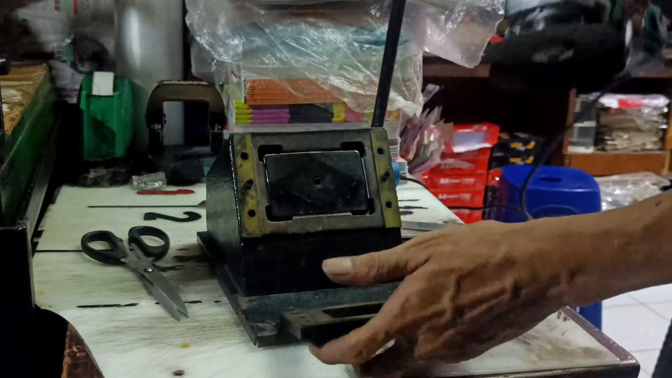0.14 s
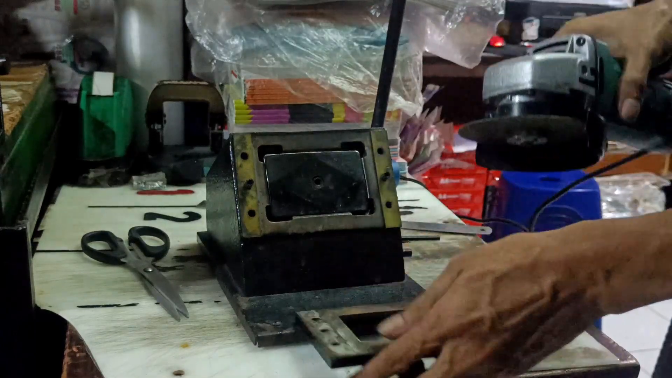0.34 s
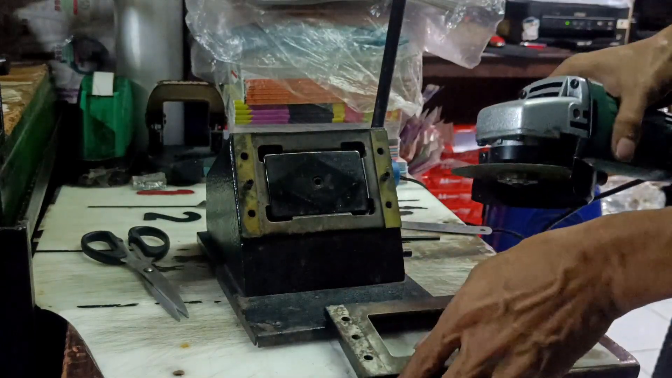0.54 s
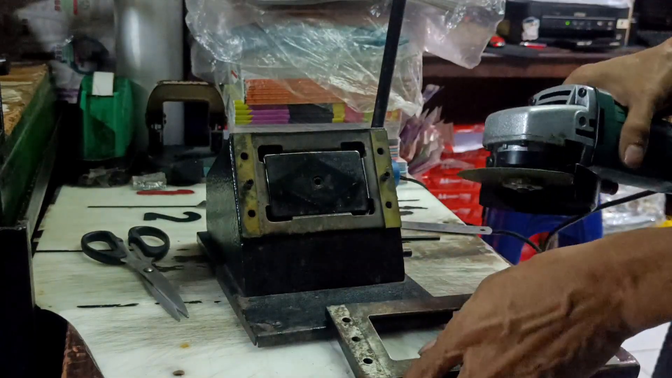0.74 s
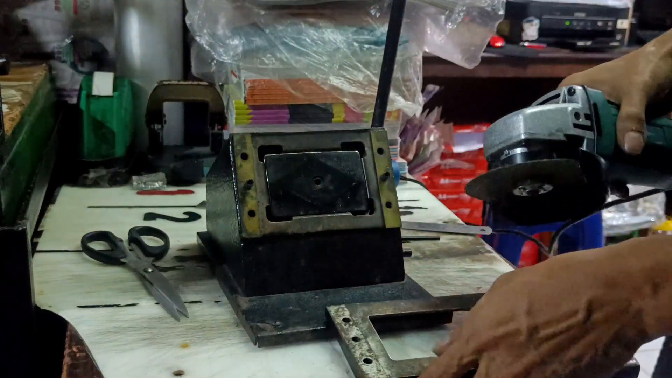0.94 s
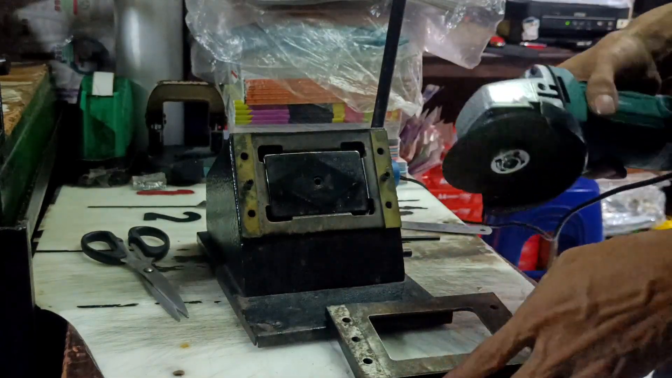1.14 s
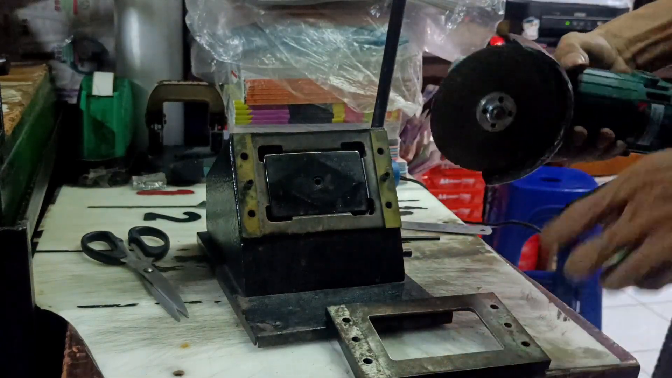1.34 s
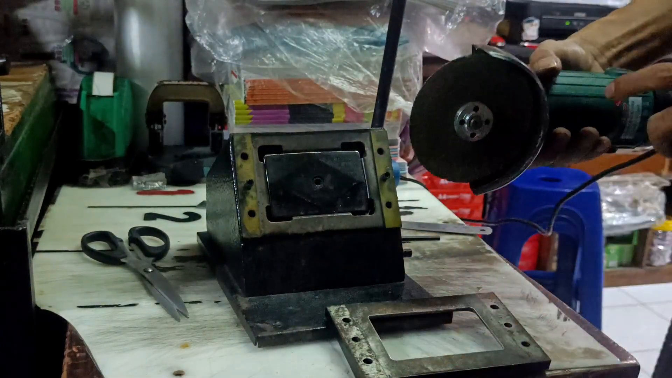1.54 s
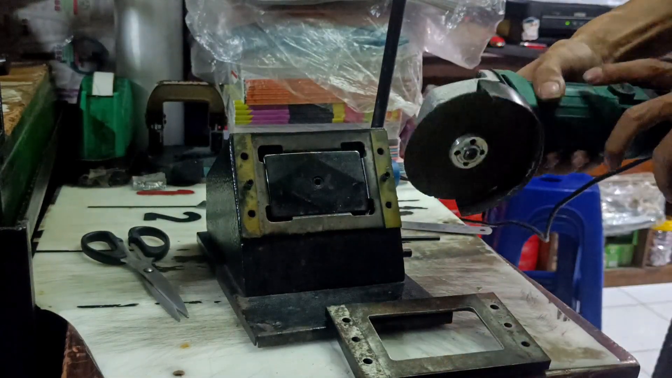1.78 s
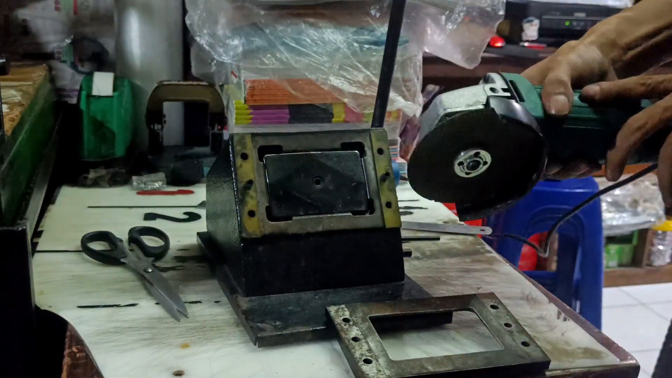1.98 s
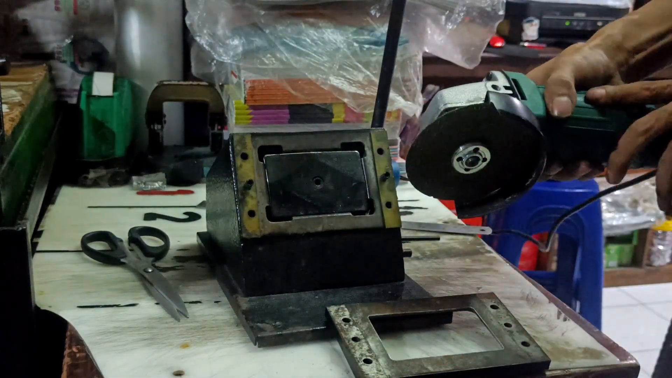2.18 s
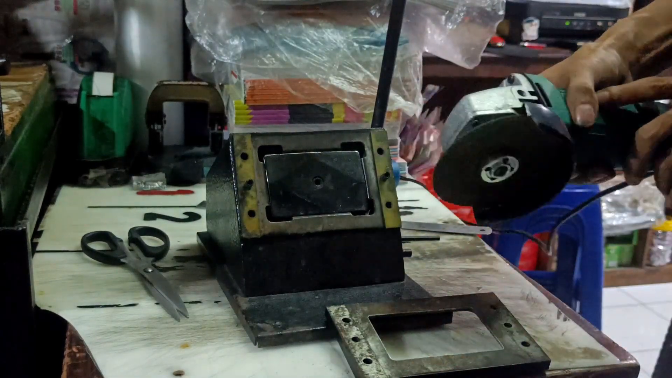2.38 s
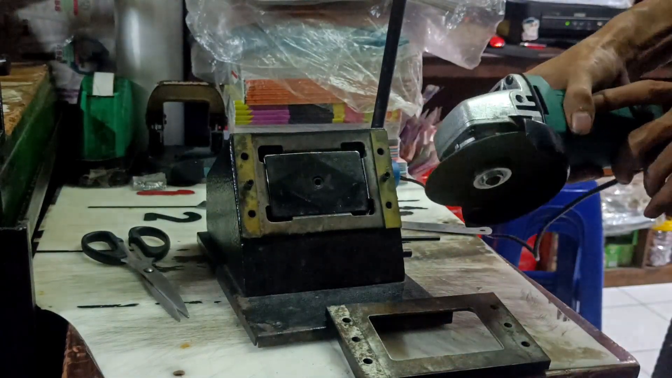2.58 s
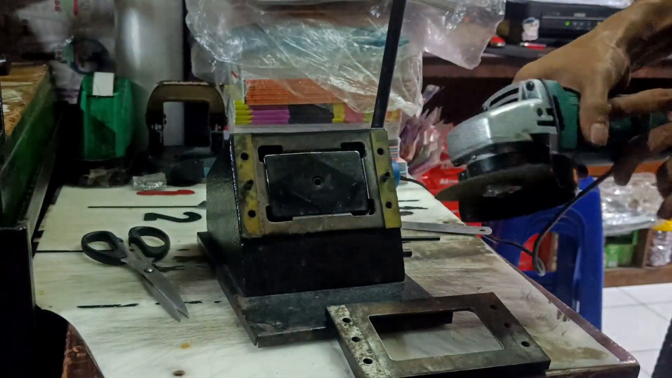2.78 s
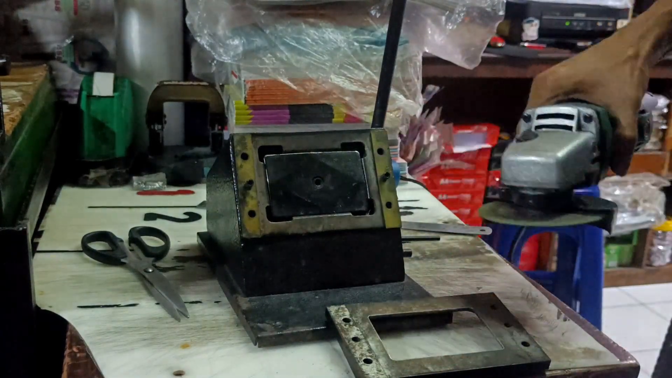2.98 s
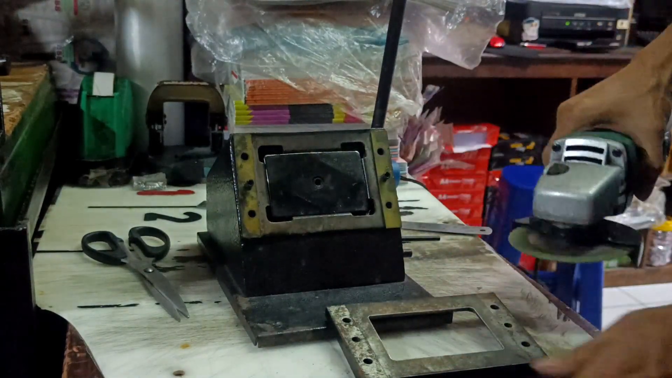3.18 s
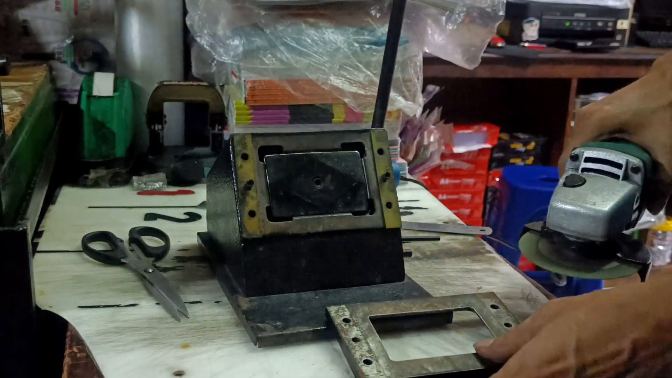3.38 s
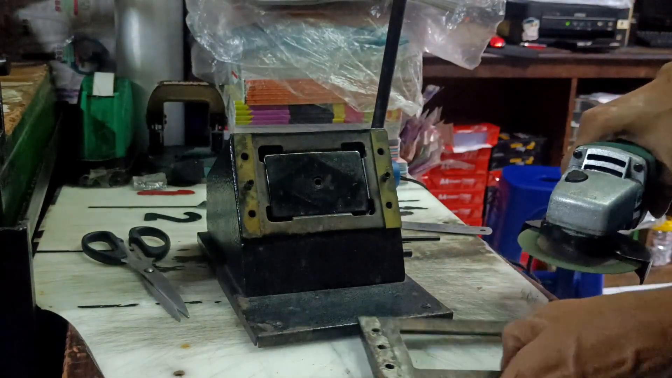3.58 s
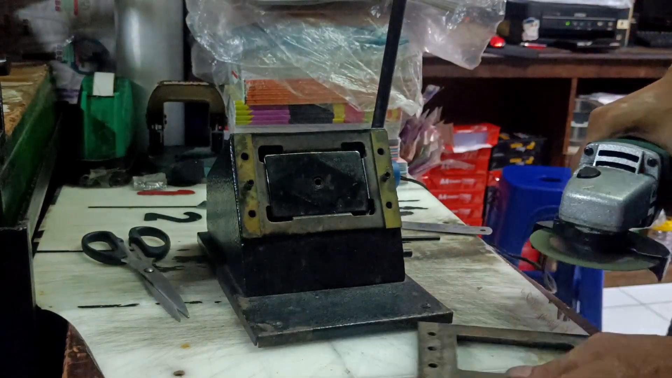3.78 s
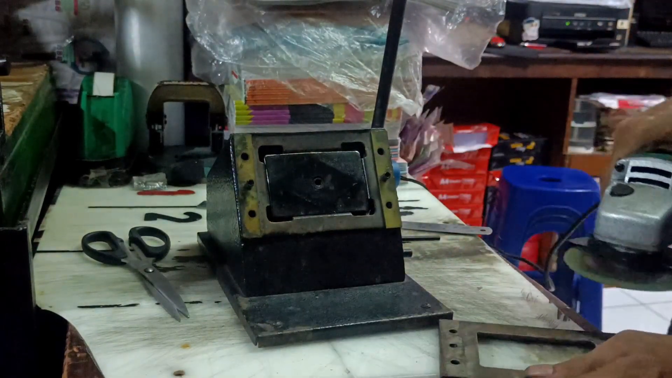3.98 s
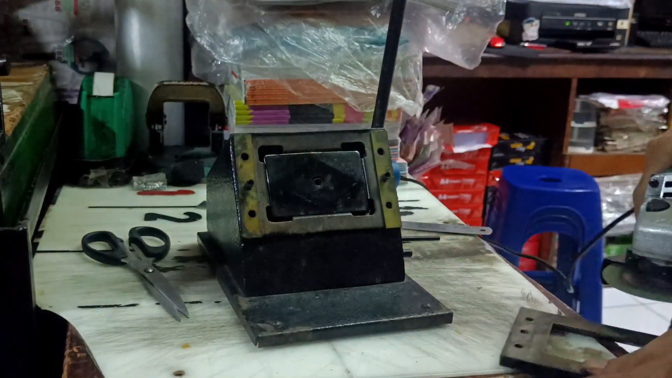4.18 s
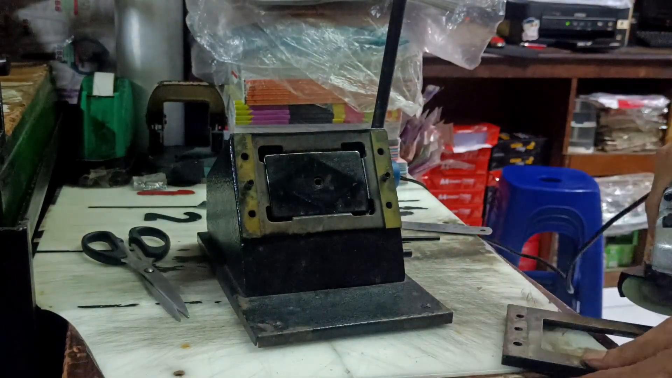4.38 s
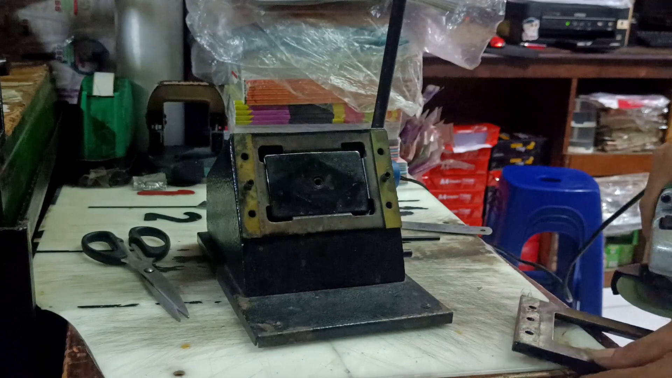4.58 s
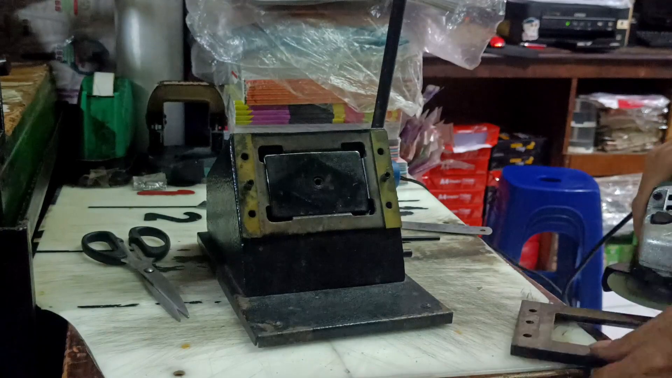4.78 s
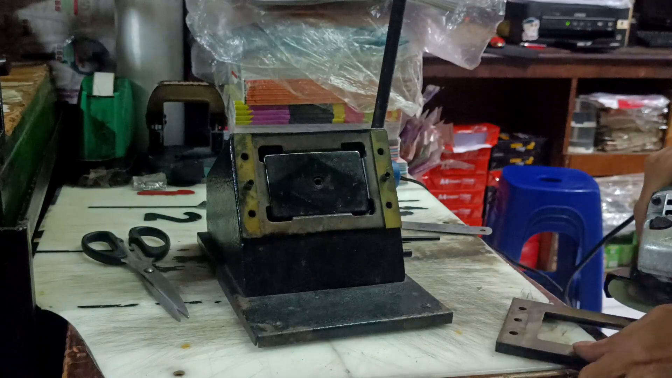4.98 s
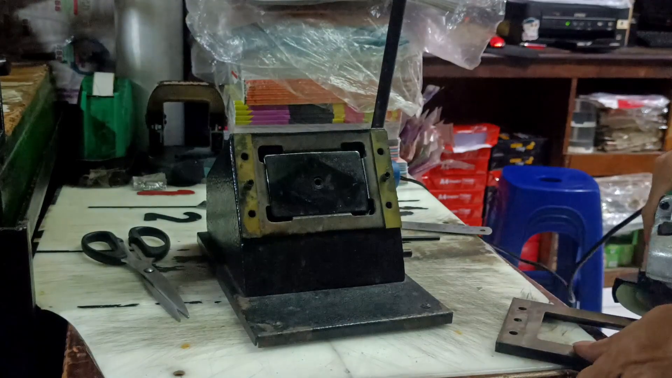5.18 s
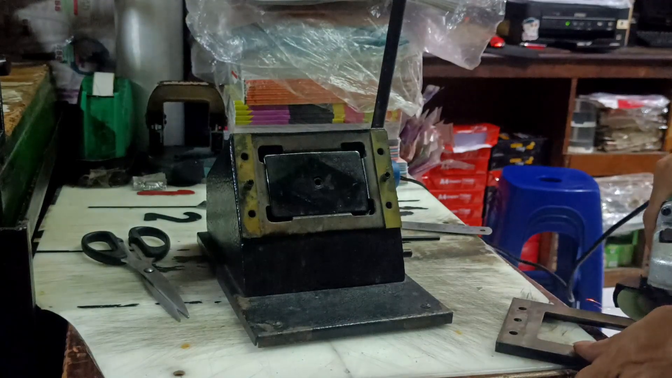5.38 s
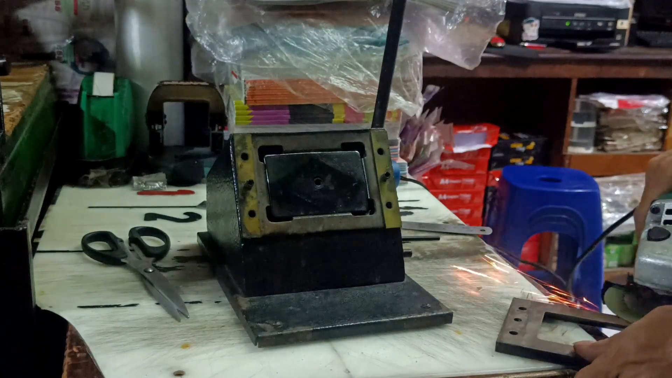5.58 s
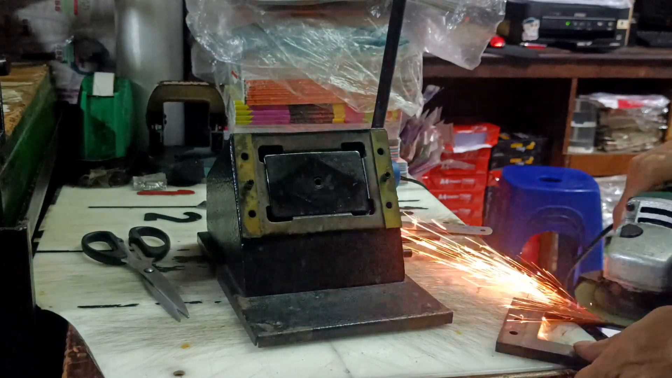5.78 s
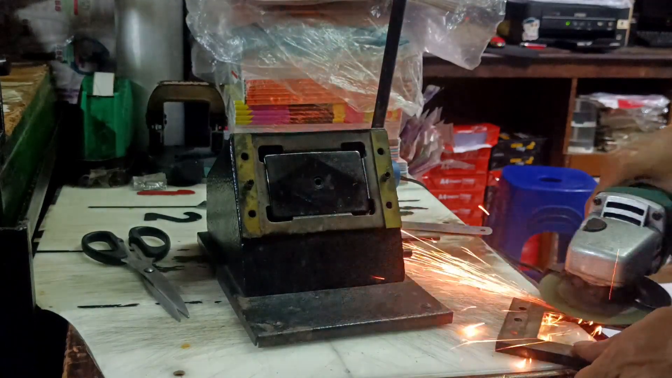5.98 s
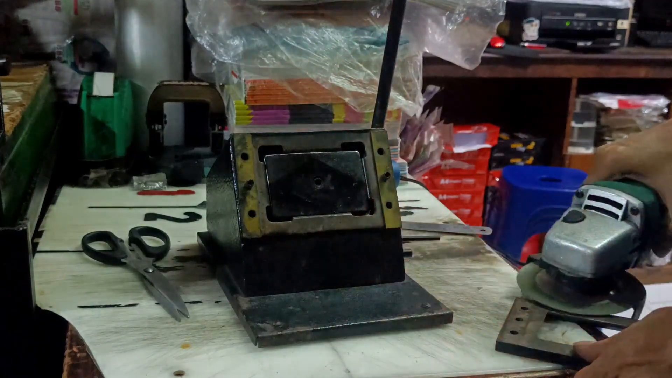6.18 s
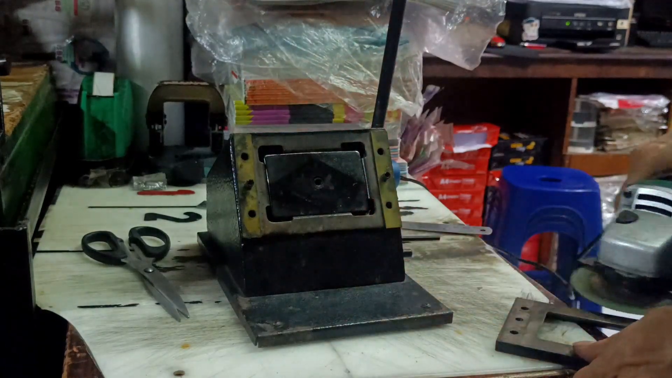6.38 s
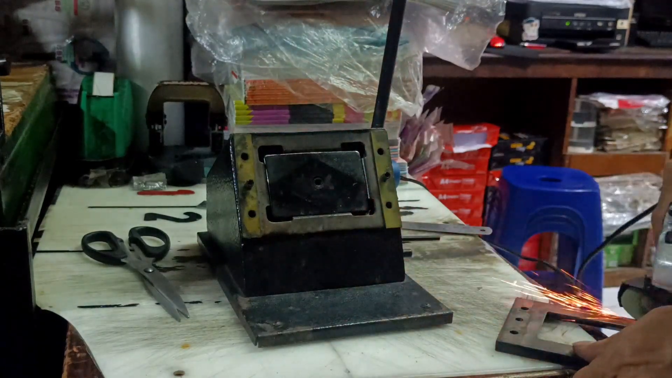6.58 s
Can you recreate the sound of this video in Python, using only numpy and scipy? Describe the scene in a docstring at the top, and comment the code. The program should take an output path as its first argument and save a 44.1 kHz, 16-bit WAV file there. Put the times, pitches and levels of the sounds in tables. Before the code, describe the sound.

Close stereo sound from a small open-fronted shop: soft traffic rumble, steel scraping and knocking on a wooden bench. After a lull, a handheld grinder starts abruptly, its motor shuddering then racing up to a bright, wavering whine with airy hiss. The part clacks sharply; later the disc bites steel with uneven rasping chatter, the motor sags slightly, the tool swings away duller, and the disc touches again.

```python
"""An angle grinder is switched on in a small shop open to a street, runs up to speed and is pressed on a
steel part, which chatters; two microphone ports hear the tool from one side. Shaped noise makes its rush,
sines locked to the turning armature make whine, hum and chatter, and low noise makes the disc's puffs.
Before that the part is slid and set down on a wooden bench (friction noise, ringing modes); a few more
clacks follow. Behind lie rumble, wash and a hiss that swells around the switch-on, and passing engines."""
import sys
import numpy as np
from scipy import signal
from scipy.io import wavfile
from scipy.ndimage import uniform_filter1d

SR = 44100
rng = np.random.default_rng(int(sys.argv[2]) if len(sys.argv) > 2 else 0)


def inscribe(sig):
    """Save sig as 16-bit PCM at rate SR to the path in sys.argv[1].

    A 1-D sig is mono; a 2-D sig holds one channel per row.
    Samples are clipped to [-1, 1] before scaling.
    """
    pcm = np.round(np.clip(np.atleast_2d(sig).T, -1, 1) * 32767)
    wavfile.write(sys.argv[1], SR, pcm.astype(np.int16))


N = 292824
T = np.arange(N) / SR
SWITCH_S = 2.46

# how far the left port trails the right: s, lag_samples
PORT_LAG = [(1.8, 13), (2.3, 1.8), (2.8, 1.4), (3.5, 3.7), (4.1, 5.4), (4.5, 6.6), (5.8, 5.87), (6.05, 4.5),
            (6.64, 5.9)]
# likeness of the two ports for sounds close by: pitch_hz, likeness (0 to 1)
CLOSE_LIKENESS = [(500, 0.47), (1200, 0.85), (2500, 0.34), (5000, 0.49), (9000, 0.043), (14000, 0.058)]


def gain_of(db):
    """Amplitude factor for a level in dB."""
    return 10 ** (np.asarray(db) / 20)


def evened(x):
    """Scale to rms 1."""
    return x / np.sqrt(np.mean(x ** 2) + 1e-20)


def read(points, hz):
    """Read a (pitch, value) curve along a logarithmic pitch axis."""
    f, value = np.transpose(points)
    return np.interp(np.log(hz + 1), np.log(f + 1), value)


def follow(rows, t):
    """Follow each column of a table whose first column is time in s."""
    s, *columns = np.transpose(rows)
    return [np.interp(t, s, c) for c in columns]


def wander(hz):
    """Slow chance of rms 1, changing about hz times a second."""
    knot_rate = 800  # Hz
    knots = np.arange(0, N / SR + .1, 1 / knot_rate)
    lowpass = signal.butter(2, hz, fs=knot_rate, output="sos")
    smooth = signal.sosfiltfilt(lowpass, rng.standard_normal(len(knots)))
    return np.interp(T, knots, evened(smooth))


def noise(field_db, same, size, patchy_db, lean=((1, 0),)):
    """Two-port noise; field_db(Hz, s) gives the level per Hz, broken by drifting patches."""
    hop = size // 4
    hz = np.fft.rfftfreq(size, 1 / SR)[:, None]
    t = np.arange(N // hop + 5) * hop / SR
    a, b, c, d, patches = rng.standard_normal((len(t), len(hz), 5), np.float32).T
    patches = uniform_filter1d(patches, size=size // 64, axis=0)  # smooth along pitch
    patches = evened(uniform_filter1d(patches, size=12, axis=1))  # smooth along time
    like = np.clip(read(same, hz), 0, 1)
    right = a + 1j * b
    delay = np.exp(-2j * np.pi * hz * follow(PORT_LAG, t)[0] / SR)
    left = like * right * delay + np.sqrt(1 - like ** 2) * (c + 1j * d)
    lean_gain = gain_of(read(lean, hz) / 2)
    level = gain_of(field_db(hz, t) + patchy_db * patches)
    spectrum = np.array([left * lean_gain, right / lean_gain]) * level
    return signal.istft(spectrum * np.sqrt(SR / size), nperseg=size, noverlap=size - hop)[1][:, :N]


def sides(pan_db):
    """Left and right gains that differ by pan_db, louder left when positive."""
    return gain_of(np.array([[.5], [-.5]]) * pan_db)


def tones(orders, turns_hz, waver_db, waver_hz, smear):
    """Multiples of a shaft's turning; each wavers in level and phase, a little differently at each port."""
    lag_turns = turns_hz * follow(PORT_LAG, T)[0] / SR
    turns = np.cumsum(turns_hz) / SR - np.outer([1, 0], lag_turns)
    out = np.zeros((2, N))
    for order, db in orders:
        drift = smear * (wander(waver_hz) + np.outer([.4, -.4], wander(waver_hz)))  # radians
        level = gain_of(db + waver_db * wander(waver_hz))
        out += level * np.sin(2 * np.pi * (order * turns + rng.random()) + drift)
    return np.sqrt(2) * out


def armature_hz():
    """A quick and a slow run-up to top speed, less a dip under each load."""
    # speed still to gain at the switch: turns_hz, time_constant_s
    run_up = [(238, .211), (126.9, .567)]
    # load slows the armature: slowest_s, loss_hz
    sags = [(4.921, 3.66), (6.108, 7.49)]
    top_hz, sag_s, recover_s = 500.96, .127, .289
    since = (T - SWITCH_S).clip(0)
    missing = sum(hz * np.exp(-since / tau) for hz, tau in run_up)
    sag = sum(hz * np.exp(-.5 * ((T - s) / np.where(T < s, sag_s, recover_s)) ** 2) for s, hz in sags)
    return top_hz - missing - sag


def rush():
    """Fan and brush noise; its colour shifts with speed and it throbs with the mains during the run-up."""
    # air and brushes, dropping as the tool swings away, before trims: s, level_db, boom_db, treble_db
    # (boom of the housing and treble are relative to the level)
    rush_levels = [(2.46, -20, -8.5, -9.5), (2.56, -18.5, -10, -6), (2.65, -21.5, -4, -1),
                   (3.1, -23, -1, 4), (3.6, -24.5, -2.5, 4.5), (5.0, -24, -0.5, 4), (5.8, -24.5, -1, 5),
                   (5.84, -30.5, -2, 8), (6.04, -30.5, 1, 8.5), (6.2, -31.5, -2, 5.5),
                   (6.64, -30.5, -0.7, 4.5)]
    # colour while the fan is slow and at full speed, before trims: pitch_hz, density_db (per Hz)
    slow_colour = [(300, -36), (700, -43), (946, -15), (1230, -19.5), (1560, -21.5), (1840, -15),
                   (2520, -2), (2900, -9), (4370, -11), (5340, -14.5), (8790, -4), (10700, -31.5),
                   (12900, -11), (16000, -21)]
    fast_colour = [(300, -28.5), (660, -18.5), (1000, -10.5), (1750, -6), (2750, -7.5), (4350, -2.5),
                   (5200, -7.5), (6900, -6.5), (8500, -0.5), (9800, -11.5), (11200, -21), (12400, -7),
                   (13800, -15), (16000, -13.5)]
    # resonances of the housing: pitch_hz, width_hz, added_power_db (relative to the rush)
    housing = [(831.2, 24.2, 24), (1292, 142, 13.5), (1483, 36, 7.5), (1550, 98, 10.5), (2017, 120, 3.5)]
    # how the rush leans by pitch, before an overall pan: pitch_hz, left_minus_right_db
    rush_lean = [(300, 1), (700, 3.5), (1300, 5.5), (2100, 4.5), (3300, 6), (4400, 4), (5600, -1),
                 (7000, -3), (8500, 9.5), (10000, 25.5), (11500, 19.5), (13000, -1), (15500, -0.5)]
    # the gears slam while taking up slack: s, db_over_rush
    jolts = [(2.473, 3.5), (2.482, 3), (2.54, 2.5)]
    jolt_s, mains_hz = 0.0035, 50

    def field_db(hz, t):
        speed = np.clip(np.interp(t, T, armature_hz()) / 490, 0, 1) ** 3
        level_db, boom_db, treble_db = follow(rush_levels, t)
        peaks = sum(gain_of(db) ** 2 / (1 + (2 * (hz - f) / w) ** 4) for f, w, db in housing)
        peaks_db = 10 * np.log10(1 + peaks)
        low = 1 / (1 + (hz / 1800) ** 12)  # share of boom
        high = 1 / (1 + (6300 / (hz + 1)) ** 8)  # share of treble
        fast_db = read(fast_colour, hz) + peaks_db - 27.5 - 1.93 * low - 7.7 * high
        slow_db = read(slow_colour, hz) - 29 + 12 * low + 1.3 * high
        colour_db = speed * fast_db + (1 - speed) * slow_db
        return colour_db + level_db + low * boom_db + high * treble_db + 3.5

    since = T - SWITCH_S
    # the starting current dies away, quickly and slowly
    surge = .5 * np.exp(-since.clip(0) / 0.093) + 0.44 * np.exp(-since.clip(0) / 0.71)
    mains_phase = 2 * np.pi * 2 * mains_hz * (T - 2.4615) + 0.06 * wander(30)  # twice a cycle
    throb = (0.009 + surge) * np.cos(mains_phase)
    flutter_db = 0.74 * wander(91) + 0.44 * wander(8.2)  # sparking brushes and loose gears
    switch = np.clip((since + .002) / .0015, 0, 1)
    jolt_db = sum(db * np.exp(-.5 * ((T - s) / jolt_s) ** 2) for s, db in jolts)
    gain = gain_of(6.4 * throb + flutter_db + jolt_db) * switch
    steady = noise(field_db, CLOSE_LIKENESS, size=512, patchy_db=0.93, lean=rush_lean)  # not yet throbbing
    return steady * gain * sides(-.4)


def motor():
    """Gear teeth whine once per mesh; the unbalanced armature hums."""
    # whine of the gears as the hand turns the tool, before a trim: s, level_db, left_minus_right_db
    mesh = [(2.46, -50, 2), (2.62, -32, 6), (2.72, -38, 0), (2.9, -36, -10), (2.98, -30.5, 4),
            (3.07, -25.5, 4), (3.14, -32, -2), (3.23, -25.5, 2), (3.38, -22.5, 2), (3.46, -23, 3),
            (3.6, -24.5, 2.5), (3.74, -24.5, -0.5), (4.1, -38, 24), (4.3, -29.5, 10), (4.61, -23, 0),
            (4.85, -23.5, 1), (5.04, -27, -7), (5.21, -21, 0), (5.35, -27, 8), (5.55, -23.5, 5),
            (5.81, -30.5, 5), (5.88, -41, 4), (6.0, -27, 3), (6.06, -31, 1), (6.1, -28, 2),
            (6.23, -28, 4.5), (6.41, -31, -6), (6.53, -26.5, 8), (6.64, -27, 10)]
    # weaker tones swelling as the hand turns the tool: s, one_turn_db, two_turns_db (and its multiples)
    turned = [(2.46, -65, -77), (2.75, -56, -44), (3.05, -43.5, -48), (3.35, -63, -37), (3.65, -45.5, -33),
              (4, -46, -37.5), (4.2, -39.5, -35), (4.65, -45, -38), (5.2, -49.5, -34), (5.5, -47, -35.5),
              (5.95, -57, -40), (6.2, -49, -44), (6.35, -51, -35.5), (6.64, -49, -40)]
    # level of the whine's octave: s, level_db
    octave_levels = [(2.62, -50), (2.76, -30), (3.02, -34), (3.3, -41), (4.1, -42), (4.42, -38),
                     (4.65, -42), (5.2, -36.5), (5.5, -41), (5.95, -39), (6.3, -41), (6.64, -45)]
    # tones within whine, octave and hum: armature_order, relative_db
    whine_orders = [(12, 3), (13, -15)]
    octave_orders = [(24, 2), (25, -11)]
    hum_orders = [(2, 1), (4, -1.5), (8, -0.5), (16, -4)]
    turns_hz = armature_hz()
    whine_db, pan_db = follow(mesh, T)
    one_db, two_db = follow(turned, T)
    octave_db = follow(octave_levels, T)[0]
    whine = tones(whine_orders, turns_hz, waver_db=1.3, waver_hz=14, smear=.2)
    whine = gain_of(whine_db + 1.5) * sides(pan_db) * whine
    octave = tones(octave_orders, turns_hz, waver_db=1.5, waver_hz=15, smear=.3)
    octave = gain_of(octave_db) * sides(13) * octave
    shake = gain_of(one_db) * tones([(1, 0)], turns_hz, waver_db=1.5, waver_hz=15, smear=.4)
    hum = tones(hum_orders, turns_hz, waver_db=3.0, waver_hz=8.9, smear=1.0)
    hum = gain_of(two_db) * sides(0.83) * hum
    return (whine + octave + shake + hum) * (T > SWITCH_S)


def grinding():
    """The part bounces on the disc thirteen times a turn, harder on the high spots of the disc."""
    # disc on steel, one list a contact, before trims: s, chatter_db
    contacts = [
        [(5.46, -35), (5.505, -23), (5.575, -24), (5.64, -19.5), (5.665, -26.5), (5.81, -21), (5.835, -24.5),
         (5.95, -20), (5.98, -30.5), (6.01, -20.5), (6.08, -22.5), (6.11, -32), (6.14, -26), (6.22, -50)],
        [(6.55, -44), (6.59, -30), (6.64, -29)],
    ]
    # tones of the chatter, before trims: disc_order, relative_db
    chatter = [(2, -24.5), (7, -13.5), (9, -8.5), (11, -7.5), (13, 2.5), (14, -8)]
    pinion_teeth, crown_teeth = 12, 37
    beat_depth = 0.66  # of the once-a-turn beat
    disc_hz = armature_hz() * pinion_teeth / crown_teeth
    lead = tones(chatter[4:5], disc_hz, waver_db=1.2, waver_hz=47.0, smear=0.57)  # order 13
    beats = tones(chatter[:4] + chatter[5:], disc_hz, waver_db=2.5, waver_hz=29.7, smear=0.36)
    out = np.zeros((2, N))
    for rows in contacts:
        db = follow(rows, T)[0]
        start, end = rows[0][0], rows[-1][0] + .02
        touching = np.clip(np.minimum(T - start, end - T) / 0.014, 0, 1)
        out += gain_of(db + 1.5) * touching * (lead + beat_depth * beats)
    return out * sides(2.2)


def puffs():
    """Air thrown by the disc buffets the ports: lumpy low noise, only partly alike at the two."""
    # gusts at the ports: centre_s, level_db, length_s (twice the standard deviation of the swell)
    gust_rows = [(5.96, -36.5, 0.056), (5.997, -45, 0.026), (6.053, -35.5, 0.033), (6.094, -45, .03),
                 (6.14, -46, .03), (6.602, -38, 0.017)]
    shared, own = rng.standard_normal(N), rng.standard_normal((2, N))
    band = signal.butter(2, [15, 90], "band", fs=SR, output="sos")
    air = signal.sosfilt(band, shared + 1.8 * own)
    gusts = sum(gain_of(db) * np.exp(-.5 * ((T - s) / (length / 2)) ** 2) for s, db, length in gust_rows)
    return evened(air) * gusts * sides(13.4)


def ring(modes, rise, pitch=1):
    """Decaying modes after one blow; rise is the time constant of the onset in s."""
    t = T[:SR // 2]
    ringing = sum(gain_of(db - 60 * t / t60) * np.sin(2 * np.pi * hz * pitch * t) for hz, db, t60 in modes)
    return ringing * (1 - np.exp(-t / rise))


def knocks():
    """Each blow sets the bench and the steel ringing and gives a short, scratchy tick."""
    # the part on the bench, before trims: s, bench_thud_db, steel_clack_db, tick_db, bench_pitch_factor
    blows = [(.007, -44, -34, -56, 1), (0.05, -47, -40, -61, 1.04), (0.127, -45, -32, -50, 0.72),
             (.231, -28.5, -15.5, -48, 0.89), (.241, -32, -19.5, -53, .9), (.2505, -57, -23, -64, .9),
             (0.308, -43, -48, -61, 1.1), (0.356, -28.5, -34, -58, .98), (.424, -46, -36.5, -57, 0.93),
             (0.495, -55, -44, -70, 0.89), (.541, -37, -42, -68, 0.94), (0.643, -41, -45, -71, 1.02),
             (0.701, -23, -34, -51.5, 0.96), (1.887, -55, -58, -52, 1.1), (3.674, -31, -5.5, -40, 1.17),
             (3.726, -29, -13, -62, 1.13), (3.753, -31, -18, -44, 1.04)]
    # modes of the bench (before the pitch factor) and of the steel: pitch_hz, relative_db, t60_s
    bench_modes = [(301, 6.5, 0.14)]
    steel_modes = [(775, -6, 0.073), (928, 0.5, 0.024), (1020, -8, 0.02), (1328, -12.5, 0.13),
                   (1433, 2.5, 0.031), (2492, -6, 0.013), (3640, -14, 0.027), (8400, -23, 0.074),
                   (9200, -33, .1)]
    out = np.zeros(N + SR)
    clack = ring(steel_modes, 0.00061)
    band = signal.butter(2, [4500, 12000], "band", fs=SR)
    scratch = signal.lfilter(*band, rng.standard_normal((len(blows), len(clack))))
    ticks = scratch * gain_of(-60 * T[:len(clack)] / 0.027)
    for (s, thud_db, clack_db, tick_db, pitch), tick in zip(blows, ticks):
        blow = gain_of(thud_db + 2) * ring(bench_modes, 0.0096, pitch)
        blow += gain_of(clack_db - 7.5) * clack
        blow += gain_of(tick_db + 7.0) * tick
        out[round(s * SR):][:len(clack)] += blow
    return out[:N] * sides(4.1)


def drag():
    """Friction noise sings in fixed modes of the steel and in a streak that rises with the stroke."""
    # the part dragged over the bench, before a trim: start_s, drag_db, fade_db_per_s, first_streak_hz
    strokes = [(0, -42, 142, 2080), (.125, -36, 600, 2400), (.36, -56, 43, 2300)]
    streak_hz_per_s = 4800

    def field_db(hz, t):
        power = 1e-12
        for start, db, fade_db, first_hz in strokes:
            since = (t - start).clip(0)
            streak_hz = first_hz + streak_hz_per_s * since.clip(0, .1)  # rises for 0.1 s, then holds
            modes = 1 / (1 + ((hz - 1330) / 30) ** 2)
            modes = modes + 0.17 / (1 + ((hz - streak_hz) / 70) ** 4)
            modes = modes + 0.012 / (1 + ((hz - 8600) / 600) ** 4)
            power = power + (t >= start) * gain_of(db - fade_db * since - 21.5) ** 2 * modes
        return 10 * np.log10(power)

    return noise(field_db, CLOSE_LIKENESS, size=512, patchy_db=5.0)


def street():
    """Traffic rumble and wash through the open front, and a hiss that swells around the switch-on."""
    # rumble, wash and hiss levels, before trims: s, rumble_db, wash_db, hiss_db
    # (the hiss swells around the switch-on, then settles)
    background_levels = [(0, -50, -48.5, -60.5), (.3, -47, -53, -60), (.5, -50, -53, -66),
                         (1.5, -50.5, -56.5, -66.5), (1.9, -48, -54.5, -59.5), (2.44, -45.5, -53, -51),
                         (2.55, -50, -51.5, -36), (3.7, -54, -46, -43), (4.1, -55, -49, -52.4),
                         (5, -58.5, -50.5, -52.4), (5.7, -52, -49, -52.4), (6.3, -57.5, -48.5, -52.4)]
    # colour of the background, before trims: pitch_hz, density_db (per Hz)
    air_colour = [(25, -19.5), (59, 3), (114, -6), (170, -11.5), (300, -19), (470, -13.5), (750, -25),
                  (1500, -24.5), (1750, -31), (2300, -33.5), (3200, -46), (6500, -54.5), (8400, -49.5),
                  (16000, -76)]
    # likeness of the two ports for the background: pitch_hz, likeness (0 to 1)
    air_likeness = [(30, 0.81), (70, 1), (130, 0.8), (300, 0.87), (700, 0.8), (1500, 0.12), (4000, 0.12),
                    (12000, 0.12)]

    def field_db(hz, t):
        rumble_db, wash_db, hiss_db = follow(background_levels, t)
        low = 1 / (1 + (hz / 220) ** 4)  # share of rumble
        high = 1 / (1 + (2800 / (hz + 1)) ** 4)  # share of hiss
        wash = (1 - low - high) * (wash_db - 7)
        return read(air_colour, hz) + low * (rumble_db - 18.5) + high * (hiss_db + 11.0) + wash + 4.0

    return noise(field_db, air_likeness, size=1024, patchy_db=2.5)


def engines():
    """Low firing tones that swell and fade as each vehicle goes by."""
    # passing engines: start_s, length_s, first_hz, last_hz, nearest_db
    passes = [(-.15, 0.48, 73, 75.4, -44.5), (0.395, 1.4, 73, 69.6, -60), (1.5, 1.18, 154, 158.5, -52.5),
              (2.098, 0.39, 181.7, 180, -50), (2.7, .8, 128.8, 126.7, -52), (3.798, 1.62, 64.1, 58, -46.5),
              (5.05, 0.32, 108, 111, -52)]
    out = np.zeros(N)
    for start, length, first_hz, last_hz, db in passes:
        progress = np.clip((T - start) / length, 0, 1)
        hz = first_hz + (last_hz - first_hz) * progress
        swell = np.sin(np.pi * progress) ** 0.84 * gain_of(db + 2.0 * wander(12))
        out += np.sqrt(2) * swell * np.sin(2 * np.pi * np.cumsum(hz) / SR)
    return out


def scene():
    """The grinder, the part on the bench and the background, summed at the two ports."""
    return rush() + motor() + grinding() + knocks() + drag() + puffs() + street() + engines()


def record(dry):
    """The preamplifier hisses and rounds off the highest peaks; then the band limit."""
    preamp_db, edge_hz = -84, 15760
    knee, headroom = .6, .37  # peaks bend above the knee, towards knee + headroom
    hissing = dry + gain_of(preamp_db) * rng.standard_normal(dry.shape)
    over = np.maximum(abs(hissing) - knee, 0)
    rounded = hissing - np.sign(hissing) * (over - headroom * np.tanh(over / headroom))
    lowpass = signal.firwin(2047, edge_hz, window=("kaiser", 9), fs=SR)
    return signal.oaconvolve(rounded, lowpass[None], "same")


dry = scene()
out = record(dry)
inscribe(out)
```